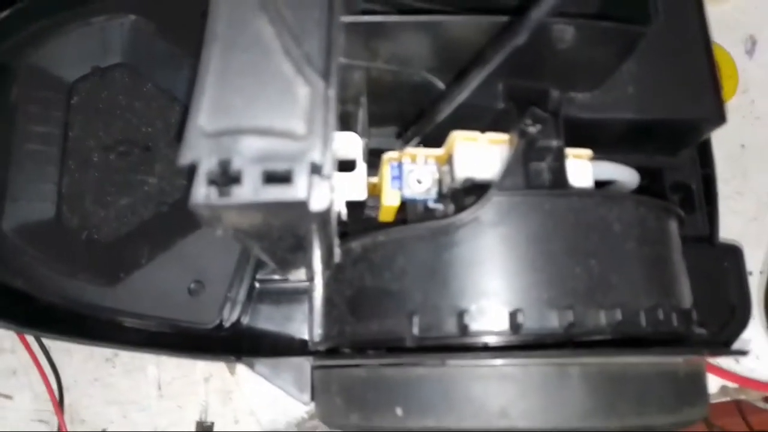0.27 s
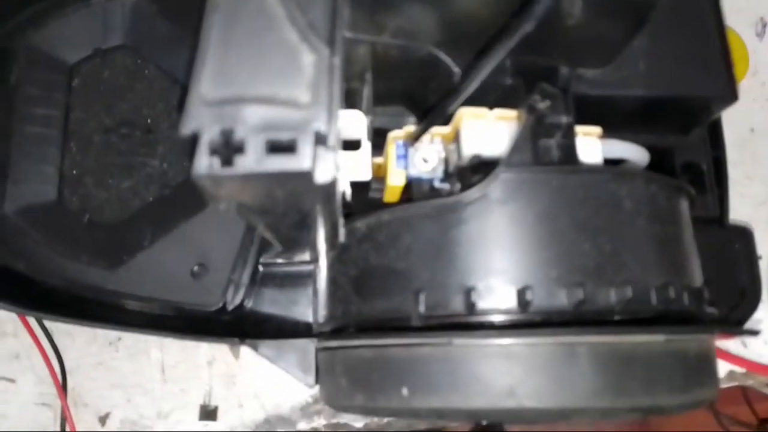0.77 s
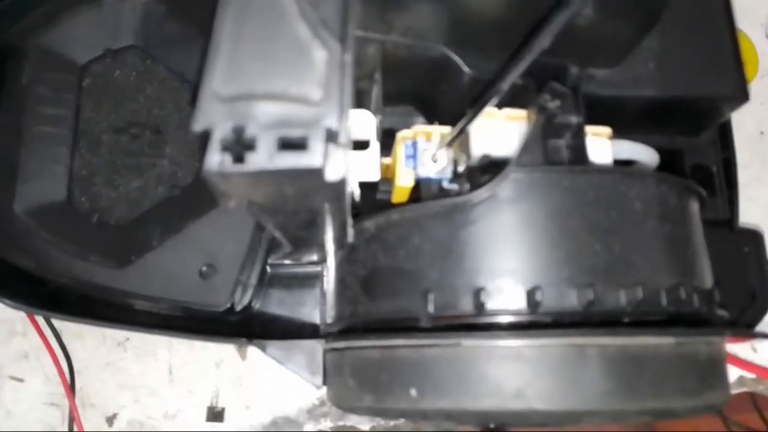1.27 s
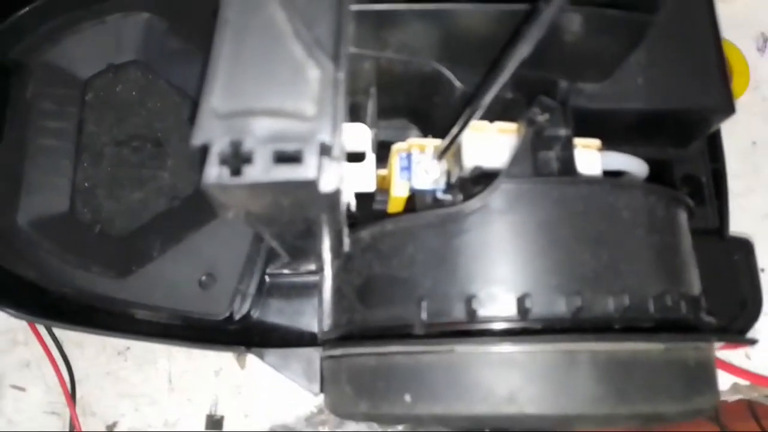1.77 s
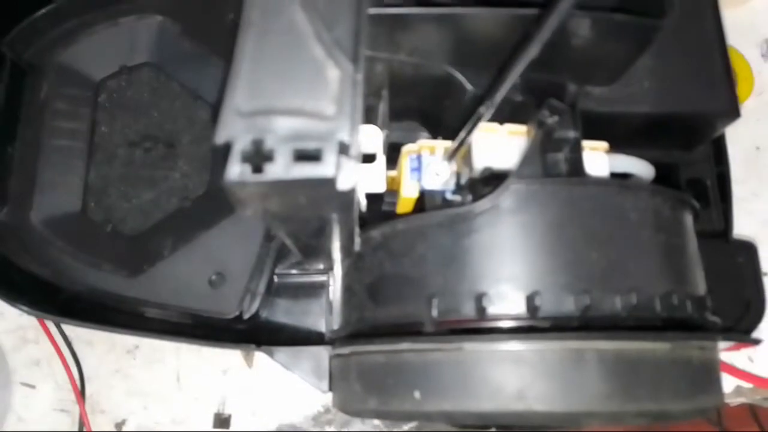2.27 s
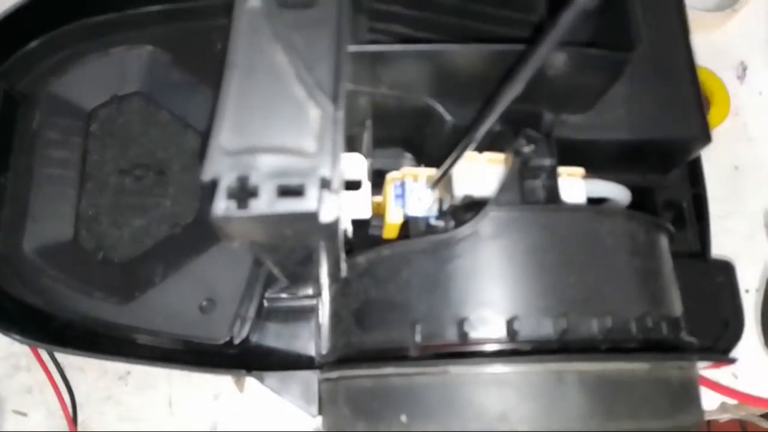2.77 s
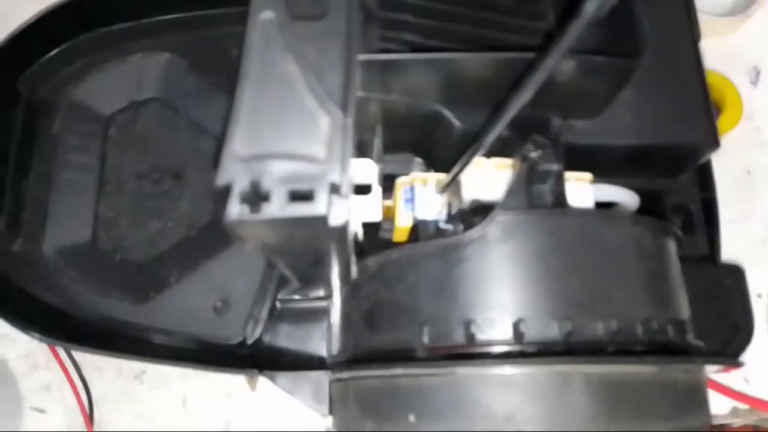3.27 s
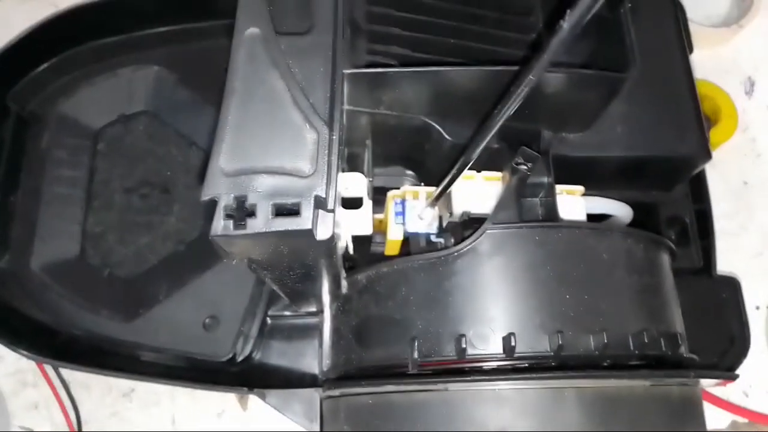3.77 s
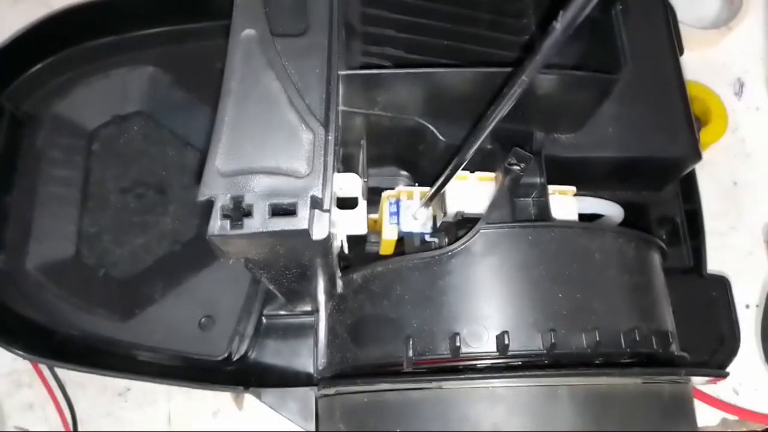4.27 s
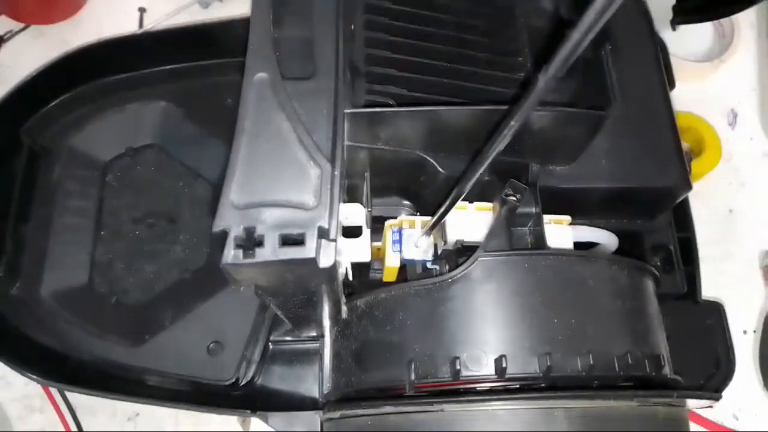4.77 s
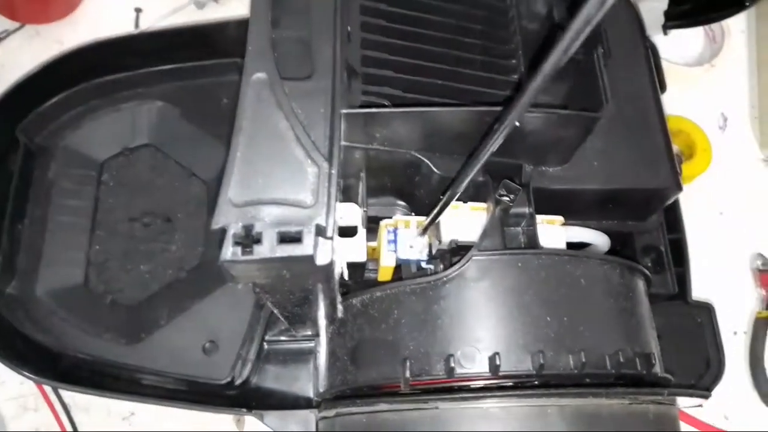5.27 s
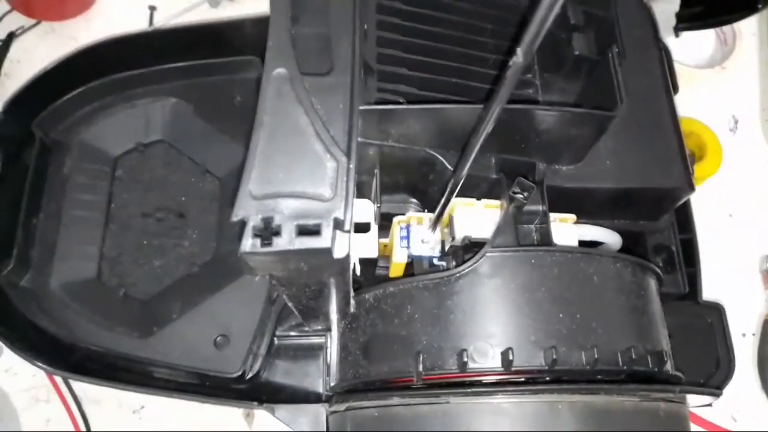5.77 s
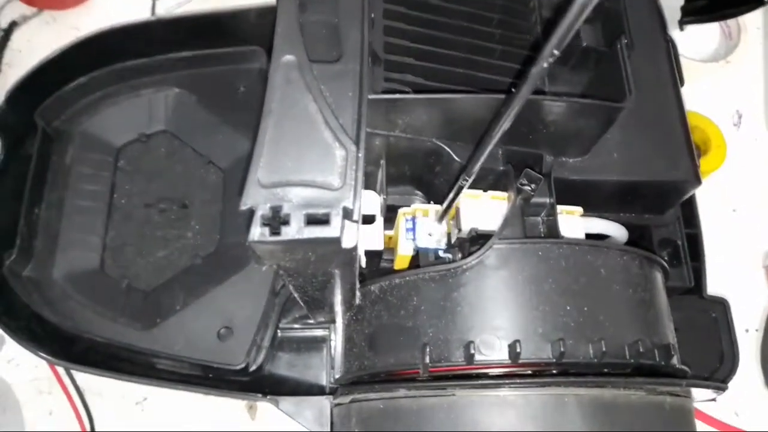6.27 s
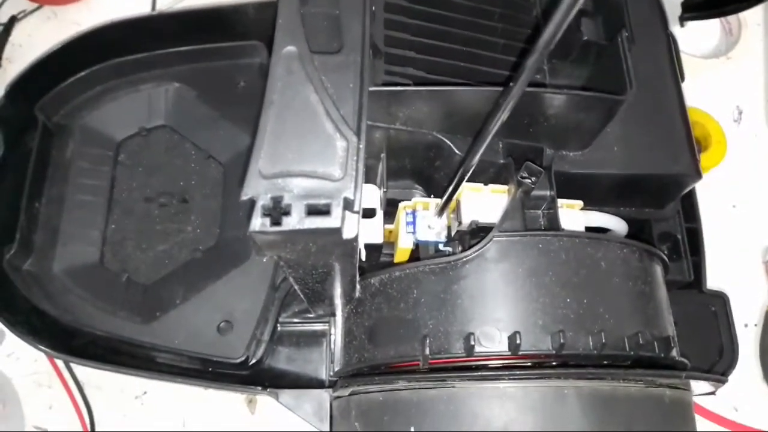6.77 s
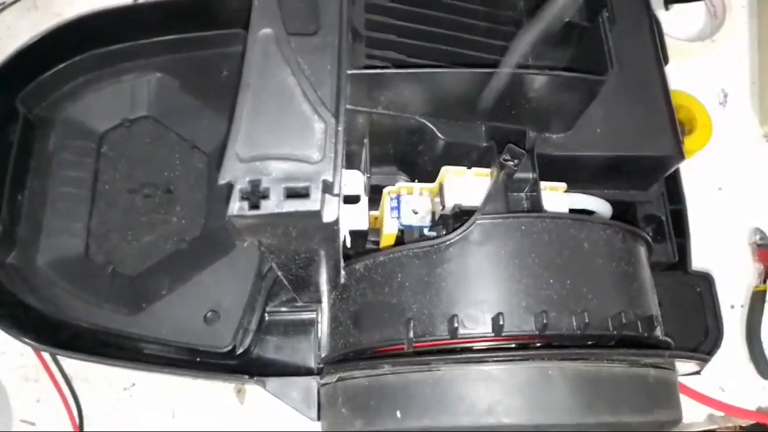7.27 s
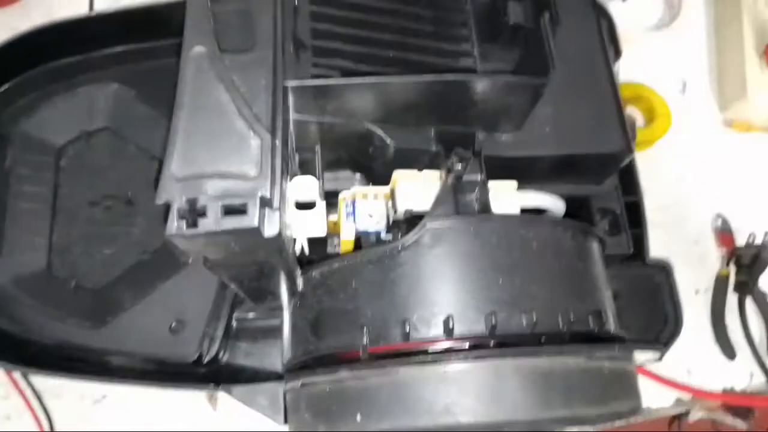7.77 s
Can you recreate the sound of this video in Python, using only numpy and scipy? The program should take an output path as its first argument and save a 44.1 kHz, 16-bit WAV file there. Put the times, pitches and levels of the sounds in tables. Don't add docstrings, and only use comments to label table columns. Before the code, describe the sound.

An exposed suction motor whirrs softly at low speed, heard close and dry in a room. Quick little knocks of a tool on a hard board come first. The pitch then sweeps steeply upward, fluttering in loudness as it climbs, into a shrill scream with broad harsh hiss. After a few seconds at full speed it slides down in uneven steps, still turning at the end.

```python
import sys
import numpy as np
from scipy import signal
from scipy.fft import rfft, irfft
from scipy.io import wavfile
from scipy.ndimage import uniform_filter1d

SR = 44100
rng = np.random.default_rng(int(sys.argv[2]) if len(sys.argv) > 2 else 0)


def digitize_waveform(pressure):
    field = np.atleast_2d(pressure).T
    bounded = np.clip(field, -1, 1)
    quanta = np.round(bounded * 32767).astype(np.int16)
    wavfile.write(sys.argv[1], SR, quanta)


def invert_db(x):
    u = np.asarray(x, float) / 20
    return 10 ** u


N = 353196
IDLE_HZ, FULL_HZ = 168.7, 600


def drift(rate_hz, t):
    out = np.zeros(len(t))
    for hz in np.geomspace(rate_hz / 20, rate_hz, num=24):
        out += np.sin(2 * np.pi * (hz * t + rng.random())) / np.sqrt(hz)
    return out / out.std()


# (time [s], shaft speed [Hz])
SPEED_SETTING = [(0.0, 168.8), (2.25, 168.7), (2.363, 214.9), (2.643, 237.3), (2.802, 381.0),
                 (3.009, 517.1), (3.172, 587.0), (3.353, 595.3), (4.912, 603.9), (5.115, 640.3),
                 (5.632, 643.5), (5.833, 592.3), (6.103, 457.0), (6.41, 447.6), (6.43, 388.6),
                 (6.748, 325.9), (7.206, 269.0), (7.843, 226.4)]


def shaft_speed():
    inertia_s, hand_s = .2285, .1142
    times, speeds = np.transpose(SPEED_SETTING)
    asked = np.interp(np.arange(N) / SR, times, speeds)
    keep = np.exp(-1 / (inertia_s * SR))
    lagged = asked[0] + signal.lfilter([1 - keep], [1, -keep], asked - asked[0])
    return uniform_filter1d(lagged, size=round(hand_s * SR), mode="nearest")


# (at idle [0-1], at full speed [0-1],
# half-way point above idle [Hz], steepness [-], stall loss [0-1])
FLOW_LAW = [
    (0.07, 1.03, 52.3, 1.35, 0.11),
    (0, 1.03, 55.3, 1.44, 0.1),
    (0.03, 0.97, 62, 1.93, 0.09),
    (-0.09, 1, 63, 2.5, 0.01),
]


def flow_at(speed):
    stall_hz, stall_width_hz = 379, 53
    linear_share = 0.14
    idle, full, half_hz, steep, stall = np.transpose(FLOW_LAW)[:, :, None]

    def rise(hz):
        return 1 / (1 + (half_hz / np.maximum(hz - IDLE_HZ, 1e-3)) ** steep)

    levelling = rise(speed) / rise(FULL_HZ)
    straight = (speed - IDLE_HZ) / (FULL_HZ - IDLE_HZ)
    grown = (1 - linear_share) * levelling + linear_share * straight
    faltering = stall * np.exp(-(2 * (speed - stall_hz) / stall_width_hz) ** 2)
    return idle + (full - idle) * grown - faltering


# (pitch [Hz], width [Hz], idle level [dB], full flow level [dB])
HOUSING = [(332.5, 56, -53.5, -45.5), (421.5, 32, -52, -49.5), (676, 180, -63.5, -98.5),
           (840, 71, -67.5, -105.0), (1300, 146, -58.5, -43), (1750, 100, -70, -112.9),
           (1993, 141, -48.5, -41), (2186, 100, -49, -40), (2410, 425, -53, -65), (2945, 106, -53, -40),
           (3240, 147, -51.5, -61.3), (3464, 91, -58.5, -39), (3806, 130, -63, -103.1),
           (3890, 175, -64.5, -44), (4355, 310, -71.5, -45), (5050, 620, -74.5, -48.5),
           (5828, 65, -55, -36.5), (6056, 230, -115.7, -37.5), (6170, 620, -61, -100.5),
           (6760, 530, -96.4, -40), (6900, 330, -67.5, -101.5), (7555, 73, -60.5, -35),
           (7935, 320, -55.5, -36), (8293, 137, -52, -32.5), (8700, 740, -78, -38.5),
           (9140, 230, -68, -95.4), (9290, 440, -95.9, -37), (9970, 390, -75, -42.5),
           (11170, 190, -75, -46)]
# (pitch [Hz], width [Hz], idle level [dB], full flow level [dB])
DUCT_MOAN = (307, 12, -70, -39.5)
# (pitch [Hz], idle level [dB], full flow level [dB])
TURBULENCE = [(30, -139.1, -98), (100.5, -123.8, -61), (169, -98, -76.5), (221.5, -64, -53.5),
              (580, -68.5, -45), (1570, -85.1, -45), (2960, -53.5, -39.5), (4660, -137.8, -50),
              (7300, -107.1, -43.5), (10500, -83.5, -48), (12600, -82.5, -50), (15500, -89, -53)]


def air_spectrum_db(hz, column):
    modes, base = np.transpose(HOUSING + [DUCT_MOAN]), np.transpose(TURBULENCE)
    peaks = invert_db(modes[2 + column]) / (1 + (2 * (hz[:, None] - modes[0]) / modes[1]) ** 2)
    between = invert_db(np.interp(np.log(hz + 1), np.log(base[0]), base[1 + column]))
    return 10 * np.log10((peaks ** 2).sum(1) + between ** 2)


FLOW_HZ = [700, 3200, 9600, 11000, 12200]


def air():
    hz, t, noise = signal.stft(rng.standard_normal(N), SR, nperseg=2048, noverlap=1536)
    speed = np.interp(t, np.arange(N) / SR, shaft_speed())
    gusts = np.array([drift(4., t) for _ in FLOW_LAW])
    flow = flow_at(speed) + 0.025 * gusts

    fizz = flow[3]
    finest = np.maximum(fizz - 1.4 * np.maximum(fizz * (1 - fizz), 0), np.minimum(fizz, .2))
    layers = np.vstack([flow, finest])
    grown = np.array([np.interp(np.log(hz + 1), np.log(FLOW_HZ), now) for now in layers.T]).T

    idle = air_spectrum_db(hz, column=0)[:, None]
    full = air_spectrum_db(hz, column=1)[:, None]
    relief = idle - uniform_filter1d(idle, size=70, axis=0)
    early = 0.087 * np.clip(grown * (1 - grown), 0, 1) * relief

    patches = uniform_filter1d(rng.standard_normal(noise.T.shape), size=14, axis=0)
    patches = uniform_filter1d(patches, size=8, axis=1).T
    patchy_db = 1.07 + 1.6 * np.clip(1 - grown, 0, 1) * (hz[:, None] < 1300)
    field_db = idle + grown * (full - idle) + early + patchy_db * patches / patches.std()
    per_bin = np.sqrt(2048 / 1.5)
    return signal.istft(per_bin * noise * invert_db(field_db), nperseg=2048, noverlap=1536)[1][:N]


# (pitch [Hz], level [dB])
BLADE_TONE = [(2530, -32.6), (2900, -24.3), (3450, -24.3), (3650, -34.0), (5100, -18.4), (6000, -13.0),
              (8200, -9.0), (9600, -20.7)]
# (pitch [Hz],
# width [Hz], depth [0-1])
TONE_NODES = [(2639, 265, 0.7), (3767, 221, 0.54), (4065, 160, 0.84), (4357, 211, 0.82),
              (4830, 199, 0.86), (5274, 307, 0.76), (6399, 421, 0.74), (6922, 462, 0.96),
              (7291, 332, 0.42), (7649, 265, 0.75), (8420, 141, 0.51), (8767, 170, 0.61),
              (9104, 173, 0.64),
              (4530, 131, 0.55), (4967, 54, 0.98), (5509, 133, 0.85), (5698, 135, 0.97), (7025, 54, 0.98),
              (7459, 137, 0.98), (7851, 126, 0.73), (8016, 94, 0.92), (8262, 115, 0.8), (8851, 30, 0.73),
              (8982, 14, 0.52), (9233, 37, 0.36), (9375, 112, 0.81)]


def blade_gain(hz):
    trim_db, creep_per_s = 0.2, .0016
    points_hz, db = np.transpose(BLADE_TONE)
    gain = invert_db(trim_db + np.interp(np.log(hz), np.log(points_hz), db))
    seen_hz = hz * (1 - creep_per_s * (np.arange(N) / SR - 4.5))
    for node_hz, width_hz, depth in TONE_NODES:
        gain = gain * (1 - depth / (1 + (2 * (seen_hz - node_hz) / width_hz) ** 2))
    return gain


# (multiple [-], level at idle [dB], level at full flow [dB])
ORDER_LINES = [(12, -47, -60), (16, -55, -65), (24, -68, -50), (25, -67, -55), (30, -73, -37),
               (48, -54, -70), (72, -66, -300)]
# (pitch [Hz], width [Hz], level [dB])
UNBALANCE = (450, 140, -37)
# (pitch [Hz], level [dB])
MAINS_HUM = (120.5, -70.5)


def motor():
    blades = 15
    t, speed = np.arange(N) / SR, shaft_speed()
    turns = 2 * np.pi * np.cumsum(speed * (1 + 0.000487 * drift(8., t))) / SR
    grown = np.clip(flow_at(speed)[1], 0, 1)
    out = blade_gain(blades * speed) * invert_db(1.4 * drift(25., t)) * np.sin(blades * turns)

    hz = np.arange(0, 16000, 10.)
    housing_db = air_spectrum_db(hz, column=0)
    for order, idle_db, full_db in ORDER_LINES:
        colour_db = np.interp(order * speed, hz, housing_db, right=-200)
        level_db = idle_db + grown * (full_db - idle_db) + colour_db - colour_db[0]
        out += invert_db(level_db + 1.5 * drift(6.7, t)) * np.sin(order * turns)

    mount_hz, width_hz, shake_db = UNBALANCE
    shake = invert_db(shake_db) * grown / (1 + (2 * (speed - mount_hz) / width_hz) ** 2)
    out += shake * np.sin(turns)

    hum_hz, hum_db = MAINS_HUM
    out += invert_db(hum_db + 6.8 * grown + 2 * drift(12.0, t)) * np.sin(2 * np.pi * hum_hz * t)
    return np.sqrt(2) * out


# (time [s], blow level [dB], favoured pitch [Hz], tick level [dB])
KNOCKS = [
    (1.218, -33, 2400, -39),
    (1.247, -23.5, 2000, -41),
    (1.318, -21, 2500, -34),
    (1.331, -21, 1850, -40),
]
# (pitch [Hz], level [dB], time to fade by 60 dB [s])
BOARD = [(1184, -1, .13), (1572, -8, .09), (1960, 0, .14), (2449, 0, .07), (3628, -5, .06), (4400, -5, .05)]


def screwdriver():
    t, out = np.arange(6000) / SR, np.zeros(N)
    dull = signal.butter(4, [900, 4600], "band", fs=SR)
    for s, blow_db, favoured_hz, tick_db in KNOCKS:
        ring = np.zeros(len(t))
        for hz, db, t60 in BOARD:
            octaves_off = abs(np.log2(hz / favoured_hz))
            ring += invert_db(db - 20 * octaves_off - 60 * t / t60) * np.sin(2 * np.pi * (hz * t + rng.random()))
        tick = signal.lfilter(*dull, rng.standard_normal(len(t))) * invert_db(tick_db - 60 * t / .07)
        onset = 1 - np.exp(-t / 0.0011)
        out[round(s * SR):][:len(t)] += (invert_db(blow_db) * ring + tick) * onset
    return out


def scene():
    return np.tile(air() + motor() + screwdriver(), (2, 1))


def microphone_input(x):
    limited = 1.1 * np.tanh(x / 1.1)
    return signal.sosfilt(signal.butter(1, 80, "high", fs=SR, output="sos"), limited)


# (pitch [Hz], level [dB])
WEAKEST_KEPT = [(30, -17), (90, -4), (170, -4), (260, -30), (9800, -30), (10500, -6), (11200, -14),
                (12000, 0), (13400, 1), (13900, -15), (15000, -14), (15400, -2)]


def drop_weak_parts(x):
    hz, t, z = signal.stft(x, SR, window="cosine", nperseg=2048, noverlap=1024)
    hiss_power = (abs(z[hz > 5600]) ** 2).sum(0)
    hiss_db = 10 * np.log10(uniform_filter1d(hiss_power, size=5) + 1e-12)
    hiss_db = hiss_db[0] + signal.lfilter([.3], [1, -.7], hiss_db - hiss_db[0])
    middle_db = np.clip(-76 + 3 * (hiss_db + 33), -91, -65.5)
    chance = rng.standard_normal((len(t), len(hz) // 8 + 1))
    chance = uniform_filter1d(chance, size=3, axis=0).repeat(8, axis=1).T[:len(hz)]
    points_hz, kept_db = np.transpose(WEAKEST_KEPT)
    least_db = middle_db + np.interp(hz, points_hz, kept_db)[:, None] + 6 * chance
    loud_enough = abs(z) > invert_db(least_db)
    return signal.istft(z * loud_enough, window="cosine", nperseg=2048, noverlap=1024)[1][:N]


# (time [s], low edge [Hz], high edge [Hz])
NOISE_FILLS = [(3.158, 6201, 9043), (3.366, 8871, 10422), (3.577, 4134, 5254), (3.577, 10335, 11714),
               (3.578, 12403, 13781), (3.694, 11025, 12403), (4.16, 4565, 5770), (4.319, 7493, 9043),
               (4.369, 6201, 7665), (4.392, 11714, 13092), (4.576, 6201, 7665), (4.866, 12403, 15245),
               (4.877, 4565, 8354), (5.39, 5167, 6373), (5.461, 4134, 5684), (5.596, 11627, 13092),
               (5.667, 5598, 6976), (6.318, 4134, 5167), (6.455, 13092, 14470), (6.457, 6201, 8354),
               (6.458, 4134, 5167), (7.104, 11025, 12403), (7.824, 4737, 6373)]


def fill_bands(x):
    hz, out = np.fft.rfftfreq(2048, 1 / SR), np.tile(x, (2, 1))
    window = np.sin(np.pi * (np.arange(2048) + .5) / 2048)
    for s, low_hz, high_hz in NOISE_FILLS:
        at = slice(round(s * SR) - 1024, round(s * SR) + 1024)
        band = rfft(out[:, at] * window) * ((hz > low_hz) & (hz < high_hz))
        filled = 1.5 * band * np.exp(2j * np.pi * rng.random(band.shape))
        out[:, at] += window * irfft(filled - band)
    return out


def low_pass(x):
    return signal.sosfilt(signal.butter(12, 15450, fs=SR, output="sos"), x)


def record(dry):
    mix = fill_bands(drop_weak_parts(microphone_input(dry[0])))
    return low_pass(mix)


dry = scene()
out = record(dry)
digitize_waveform(out)
```